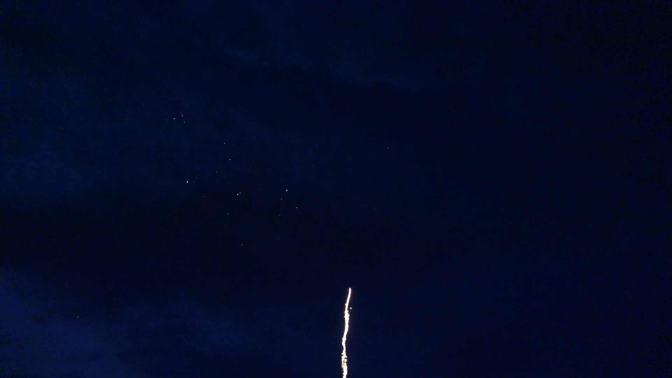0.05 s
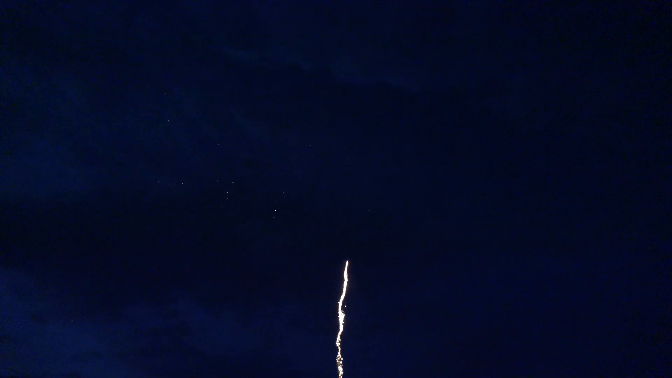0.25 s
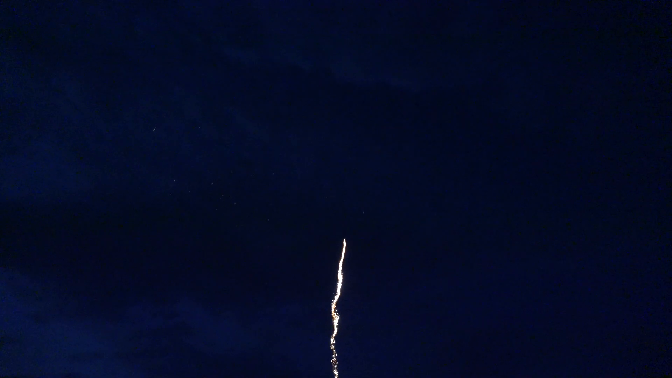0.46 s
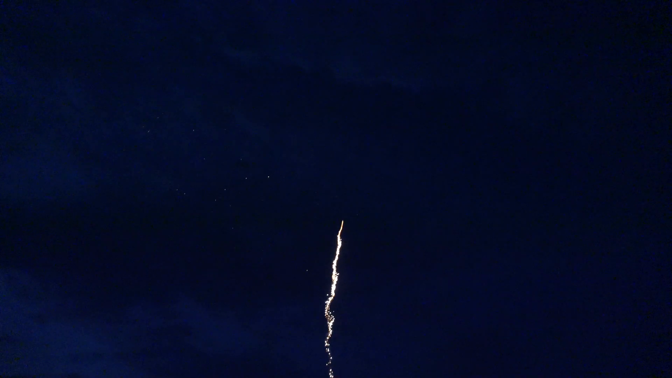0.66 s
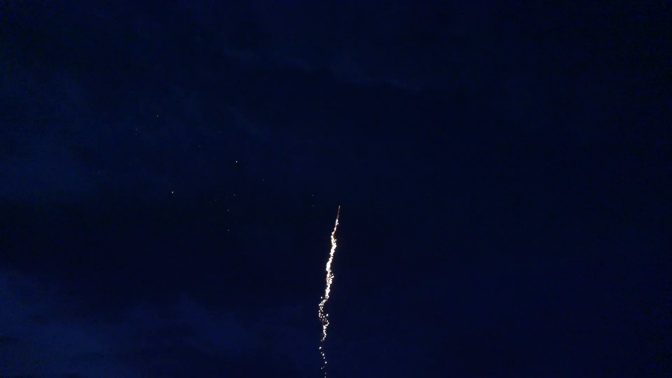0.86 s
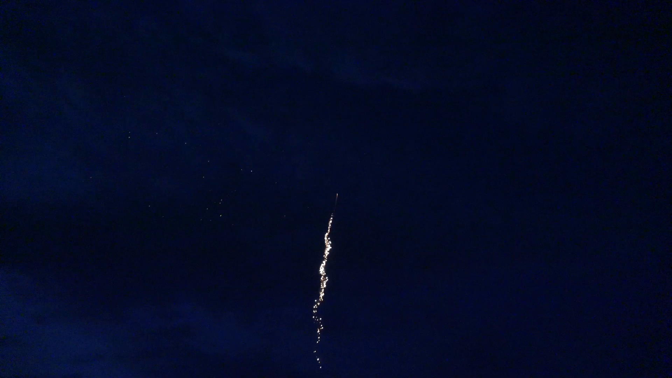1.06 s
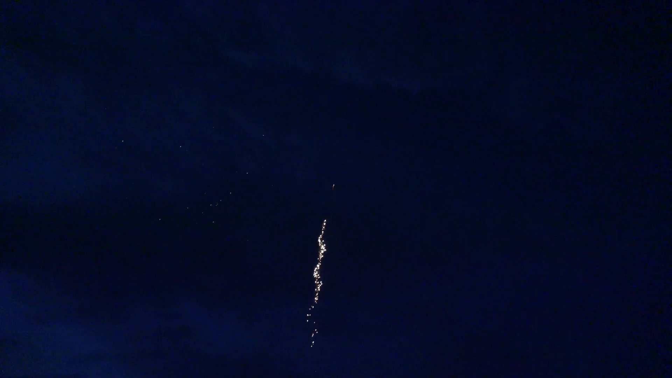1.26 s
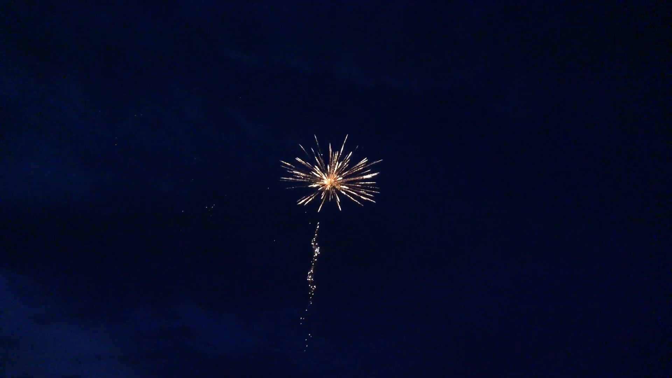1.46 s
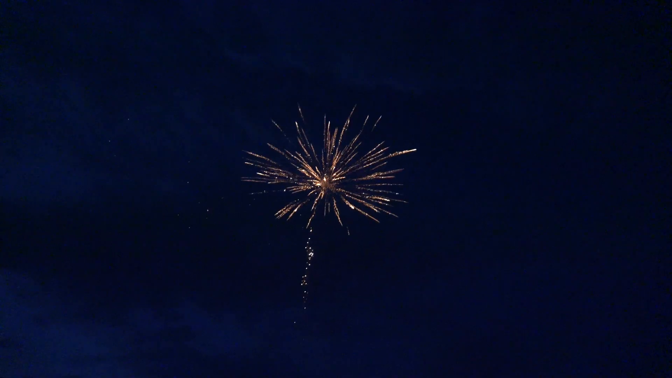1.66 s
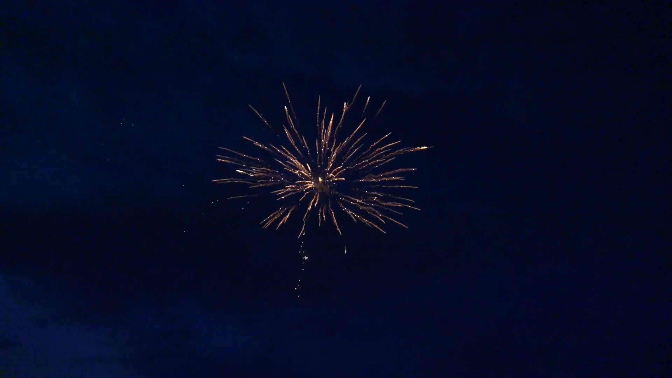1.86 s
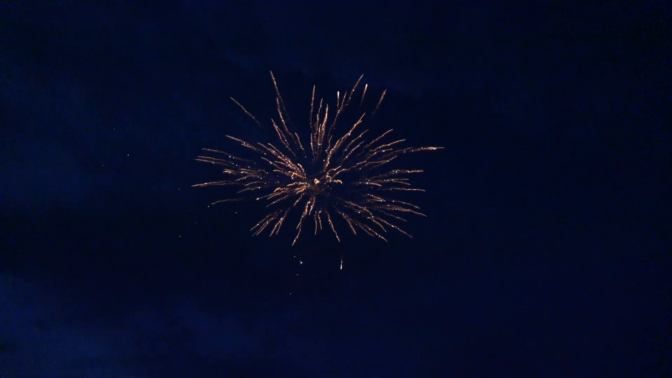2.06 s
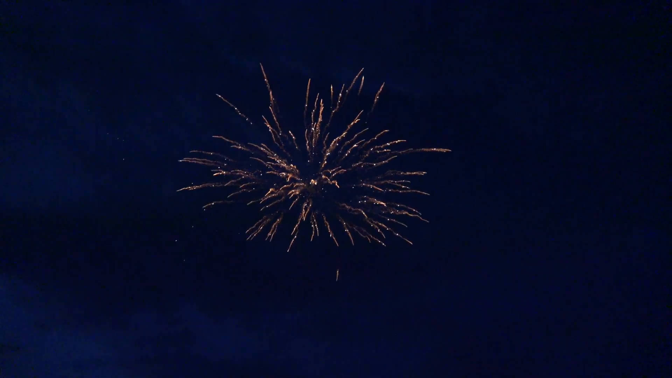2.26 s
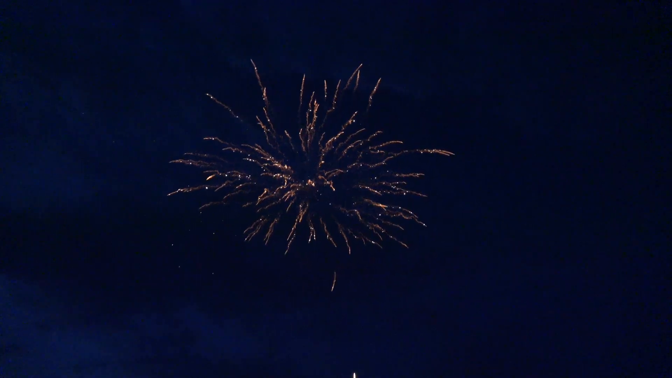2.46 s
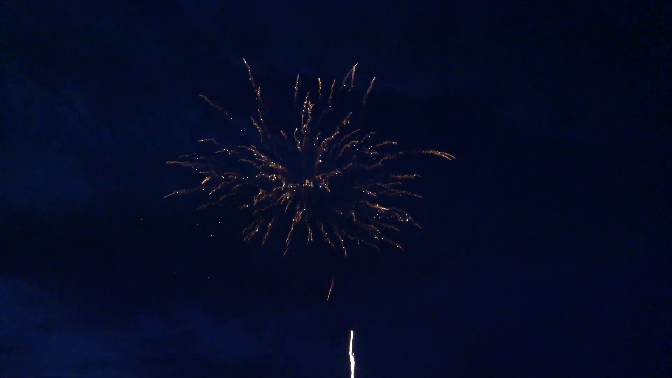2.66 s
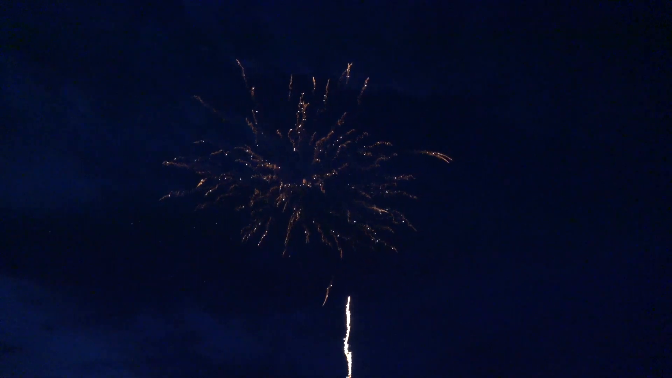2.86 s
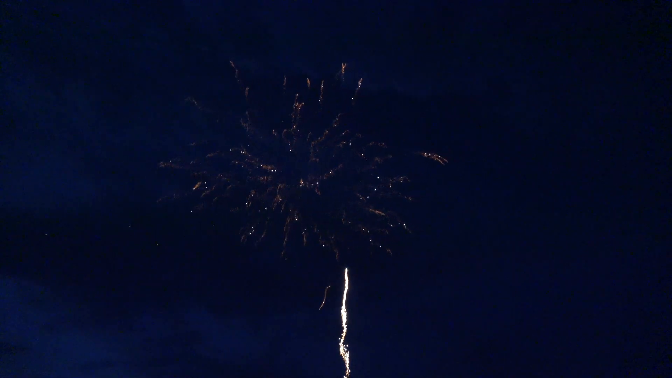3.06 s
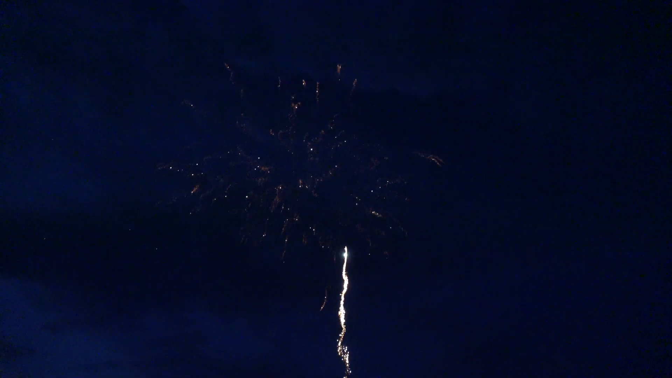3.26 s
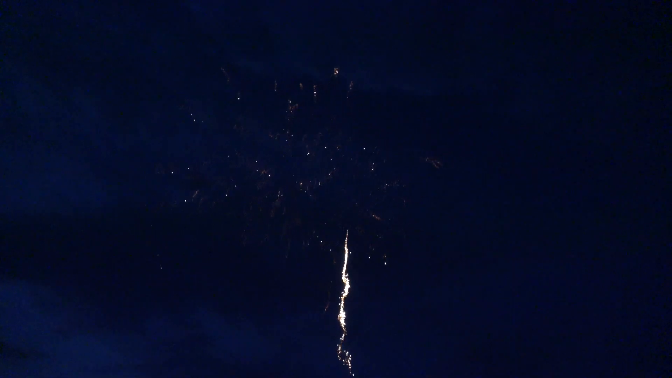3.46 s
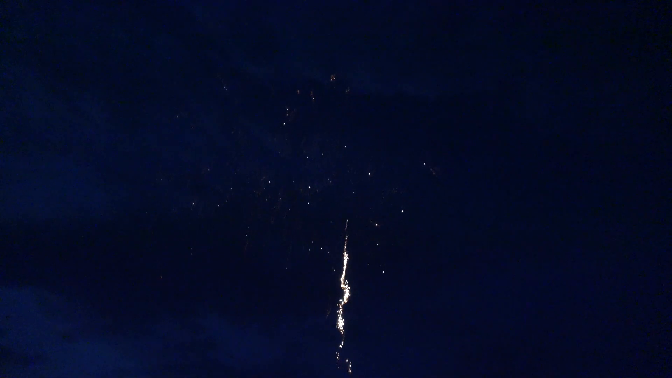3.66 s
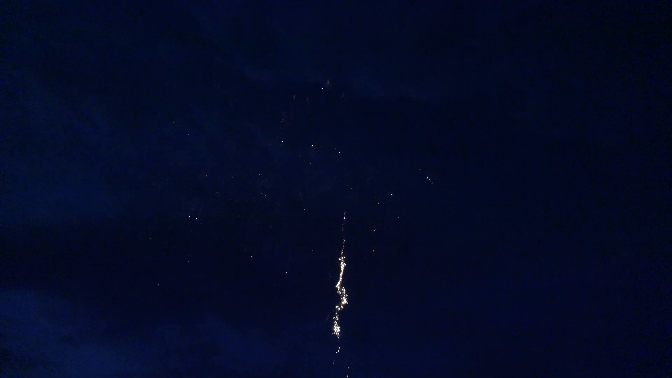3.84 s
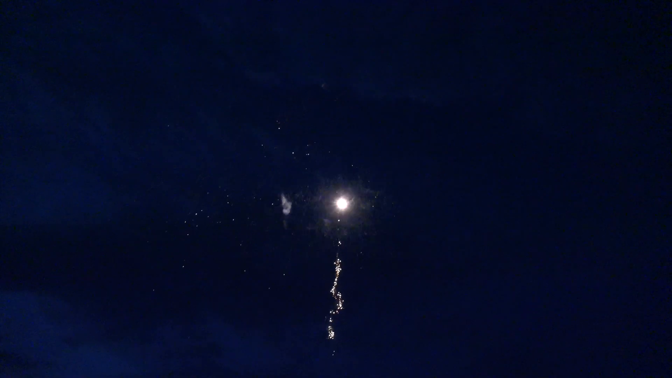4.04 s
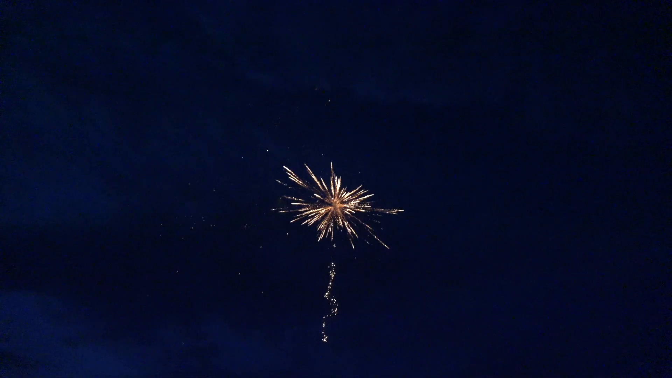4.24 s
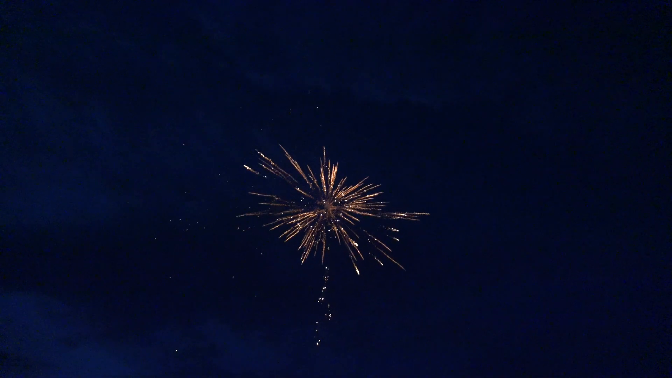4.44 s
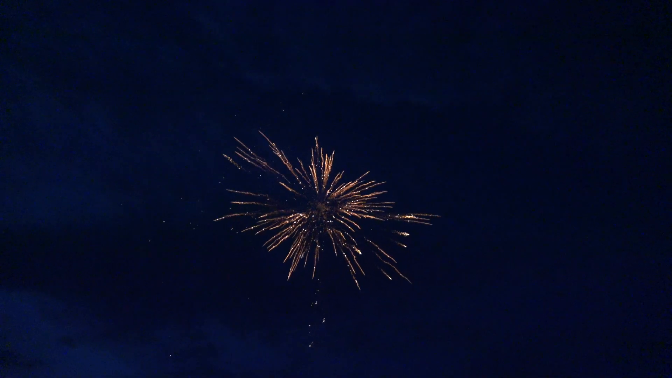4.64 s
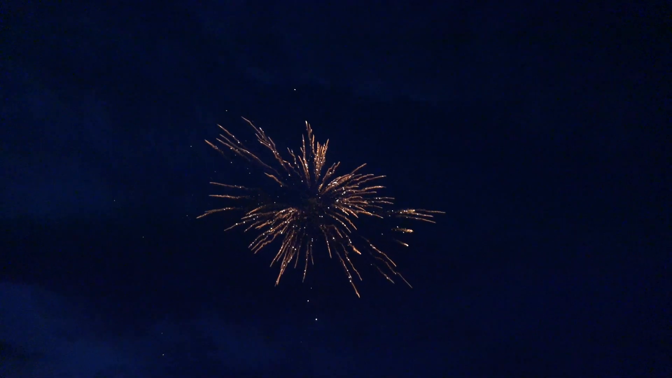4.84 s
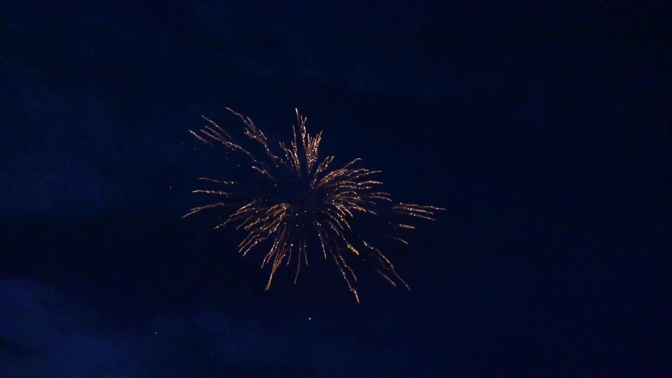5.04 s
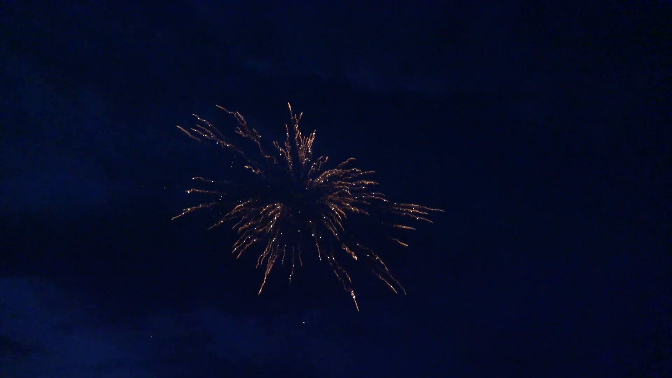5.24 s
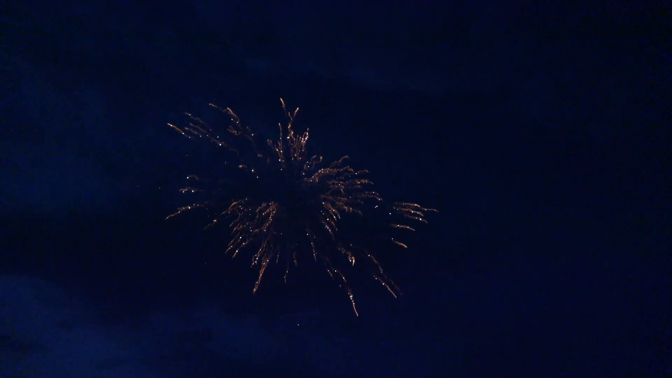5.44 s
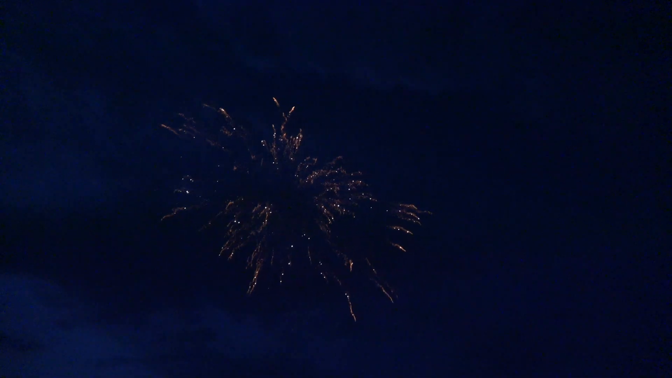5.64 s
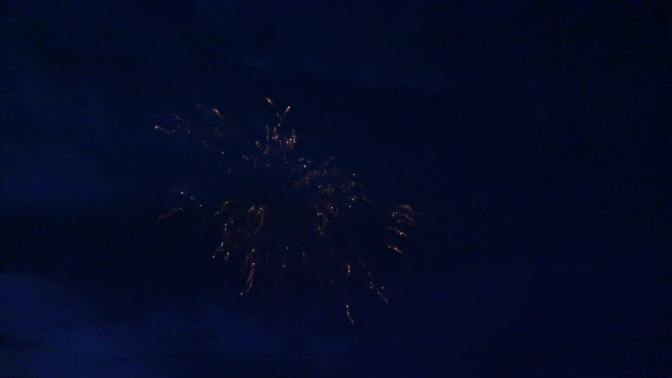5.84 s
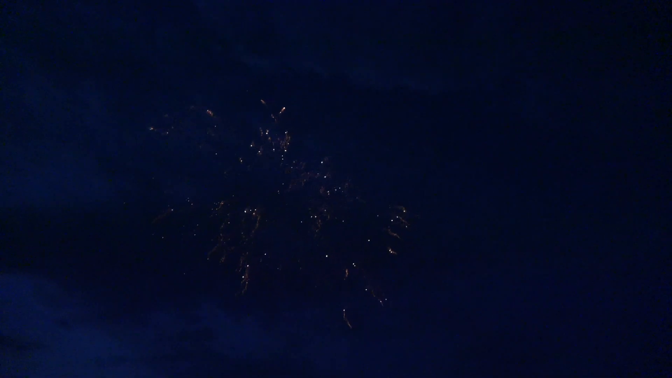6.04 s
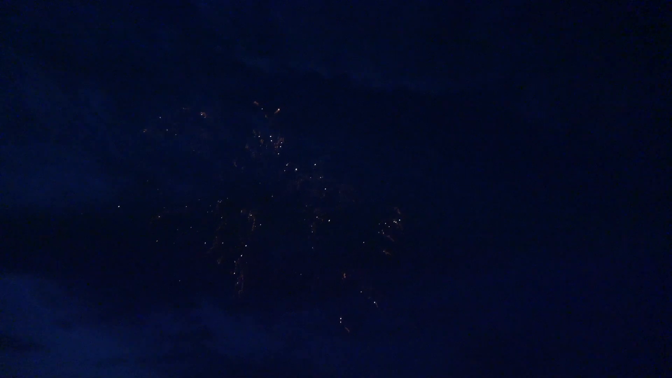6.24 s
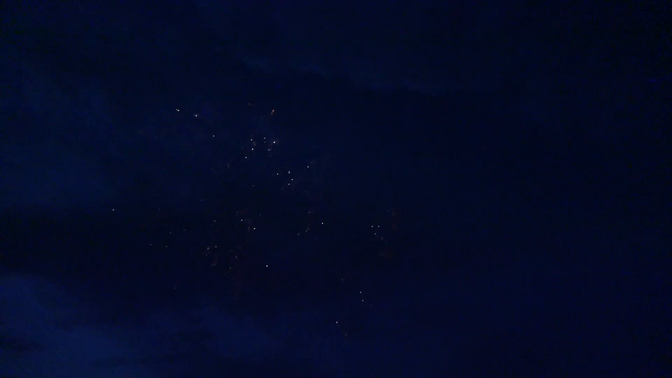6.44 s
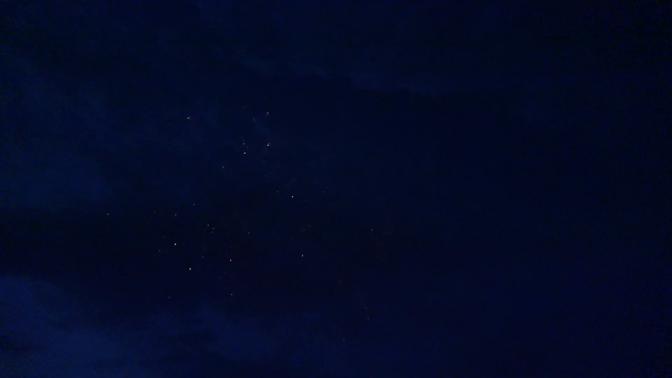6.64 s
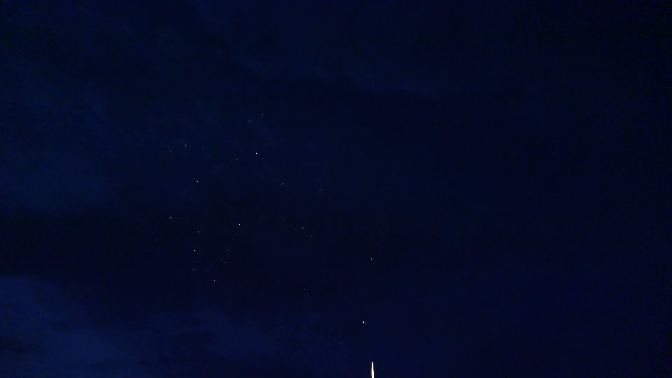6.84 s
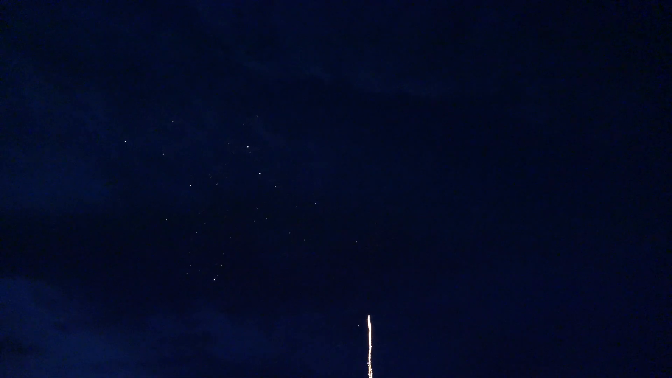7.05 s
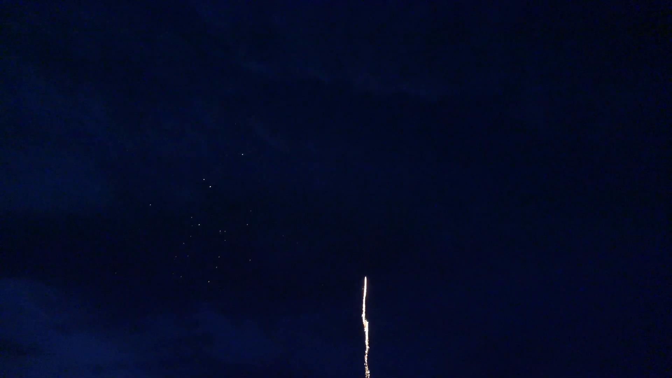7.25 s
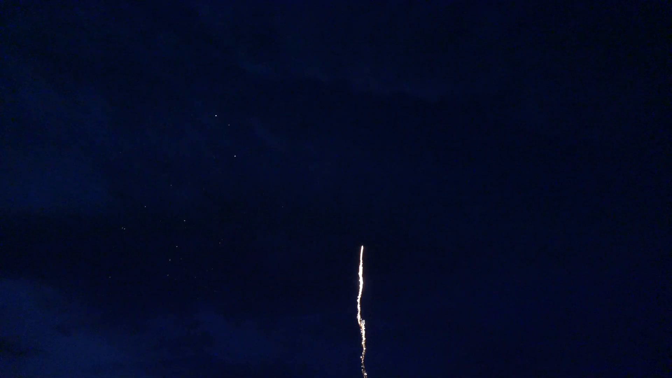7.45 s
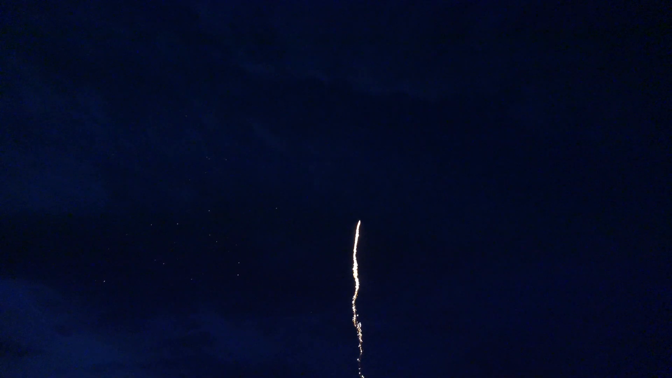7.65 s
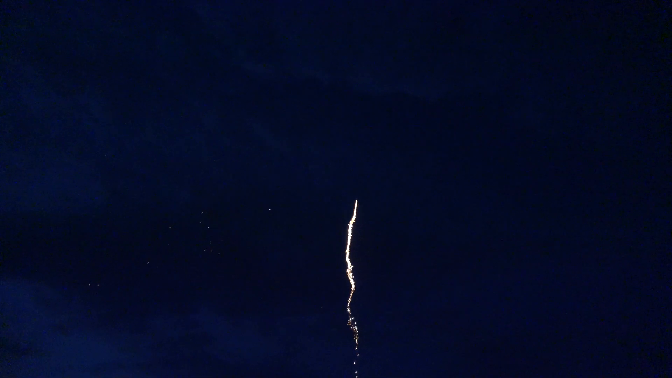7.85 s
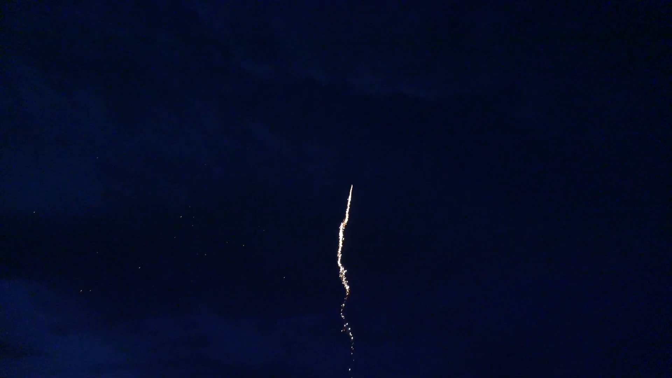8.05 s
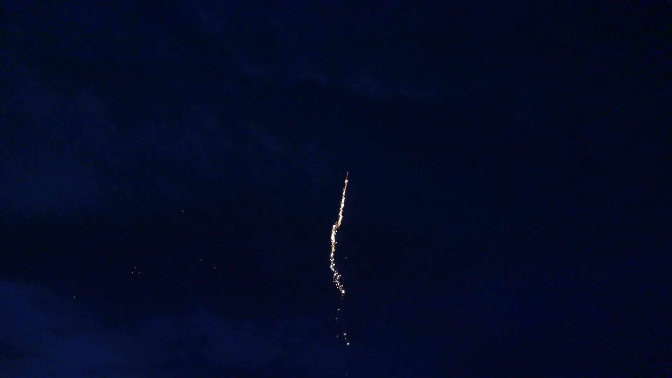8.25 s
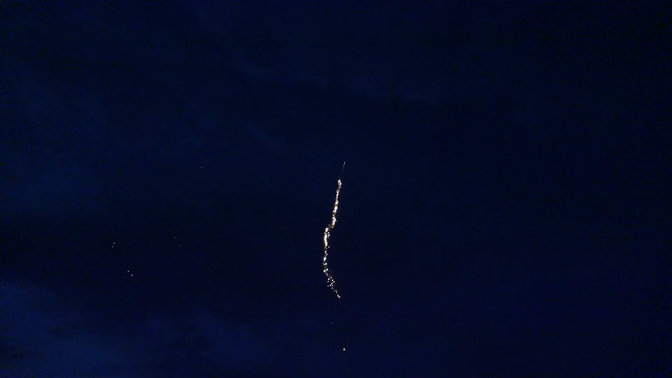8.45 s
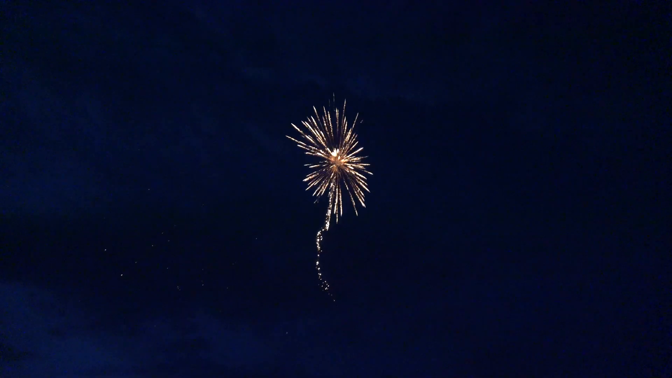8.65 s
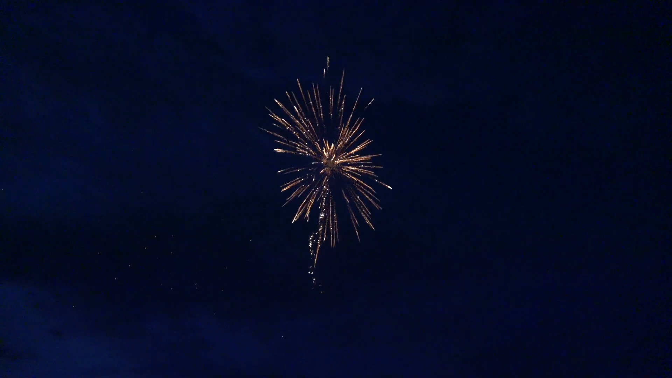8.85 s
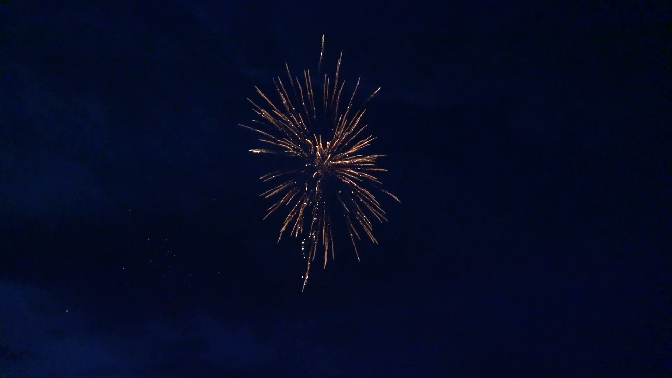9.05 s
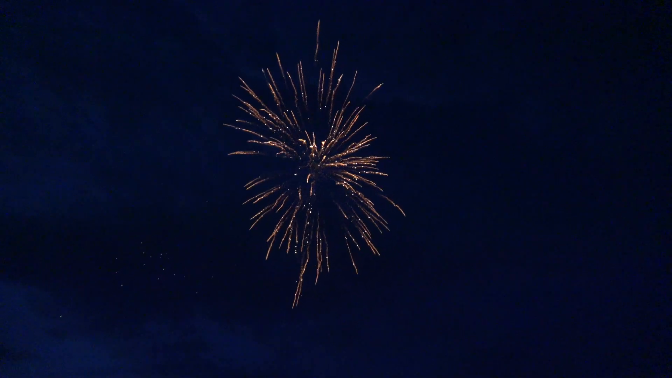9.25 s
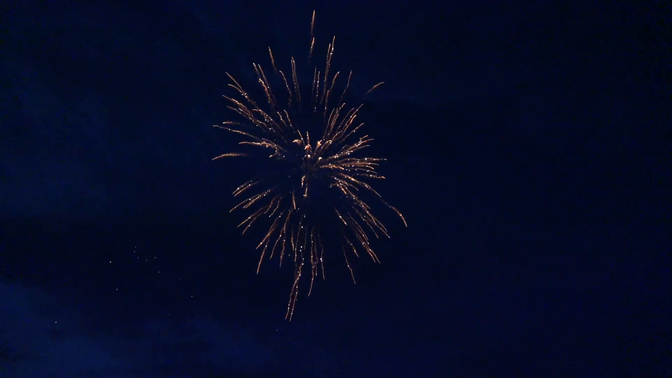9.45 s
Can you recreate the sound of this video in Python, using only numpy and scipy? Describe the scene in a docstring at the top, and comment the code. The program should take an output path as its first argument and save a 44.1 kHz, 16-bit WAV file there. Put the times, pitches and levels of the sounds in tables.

```python
"""Night fireworks and frogs

A firework cake fires over open ground: a mortar thump, two seconds later the burst overhead, each a steep
pressure front with crackle that rolls back from buildings and trees as echoes and shaped noise. Sliding sines
make a chorus of small frogs near 3 kHz, and sharp ticks are snaps of noise nearby. A faint fizz, low wind
flutter and night air are noise. One microphone feeds the left input; the unused right input only hisses.
A quick limiter tames the loud fronts."""
import sys
import numpy as np
from scipy import signal
from scipy.io import wavfile
from scipy.ndimage import uniform_filter1d

SR = 44100
rng = np.random.default_rng(int(sys.argv[2]) if len(sys.argv) > 2 else 0)


def generate_wav(sig):
    """Save sig (samples, or channels by samples) to the path in sys.argv[1] as 16-bit PCM at SR."""
    pcm = np.round(np.clip(np.atleast_2d(sig).T, -1, 1) * 32767).astype(np.int16)
    wavfile.write(sys.argv[1], SR, pcm)


N = 418950

# Bursts overhead. Each row: start in seconds, blast level in dB before the limiter, echo field level in dB.
BURSTS = [(1.6267, 28, 1.7), (4.3868, 27, 0.58), (8.7607, 28.5, 1.37)]
# Mortar thumps, one of them before the sound begins. Each row: the same columns as the bursts.
LAUNCHES = [(-.42, 16, 0.1), (2.2890, 20.6, 0.1), (6.7334, 17.4, 0.11)]
# Single reflections of a burst, the first one off the ground.
# Each row: delay in seconds, level in dB against the blast, treble limit in Hz, fading time of the puff in seconds.
BURST_ECHOES = [(.0036, -1, 4450, 0.0015), (0.0568, -30.5, 3960, 0.0036), (0.084, -28.5, 4300, 0.0032),
                (.1365, -31.5, 3000, 0.003), (.149, -44, 5500, .006), (.170, -50, 7950, .008),
                (0.342, -56, 500, .002)]
# Single reflections of a launch. Each row: the same columns.
LAUNCH_ECHOES = [(0.093, -19.5, 2550, 0.0029), (0.135, -30, 700, .002), (0.177, -36, 6000, .012)]
# Dense echoes after a burst. Each row: delay in seconds, boom off walls in dB, scatter off trees in dB.
BURST_FIELD = [(.012, -5, -14), (.03, -18, -26.5), (.054, -21.5, -32), (.059, -13, -27.5),
               (.084, -9.5, -24), (.135, -12.5, -22), (.17, -12.5, -16), (.25, -16, -12.5), (.6, -22, -12),
               (1.15, -22.5, -19), (2.3, -31, -31.5)]
# Dense echoes after a launch. Each row: the same columns.
LAUNCH_FIELD = [(.015, -19, -40), (.05, -30, -33), (.11, -24, -41.5), (.172, -62, -36), (0.181, -23, -22.5),
                (.3, -24.5, -18), (.7, -31.5, -28), (1.3, -39, -38.5), (2, -62, -52)]
# Tone balance of the boom. Each row: frequency in Hz, relative level in dB per Hz.
BOOM_SPECTRUM = [(25, -40), (50, -6.5), (100, 1.8), (170, 7), (260, -3), (340, -4.5), (450, -9.5),
                 (600, -21.5), (1200, -77)]
# Tone balance of the scatter after a burst. Each row: frequency in Hz, relative level in dB per Hz.
BURST_SCATTER = [(200, -53), (450, 0), (650, -3), (900, 1), (1100, -3.5), (1350, -3), (1650, -6),
                 (1900, -4.5), (2500, -7), (3300, -7), (4500, -10.5), (7000, -11.5), (9500, -16.5),
                 (11000, -27)]
# Tone balance of the scatter after a launch. Each row: frequency in Hz, relative level in dB per Hz.
LAUNCH_SCATTER = [(200, -35), (450, -0.5), (900, 1.5), (1500, 2), (2500, 3.5), (4000, -3), (7000, -7),
                  (11000, -19)]
# The boom narrows as it rolls on. Each row: frequency in Hz, loss in dB per second.
BOOM_LOSS = [(60, 7.5), (110, 13), (170, 3), (260, -1), (350, 10), (600, 7)]
# Air dulls the longer paths. Each row: frequency in Hz, loss in dB per second.
AIR_LOSS = [(1500, 1.91), (2500, 7), (4000, 12.5), (7000, 28.5), (11000, 50.5)]
# Nearer frog calls. Each row: start in seconds, starting pitch in Hz, length in seconds, level in dB.
NEAR_PEEPS = [(.34, 2695, 0.084, -25), (1.072, 3070, .066, -25), (1.201, 2775, .17, -24),
              (1.421, 2900, 0.047, -25), (2.81, 2800, .071, -29), (3.484, 2810, 0.081, -27.5),
              (3.52, 3140, 0.055, -32), (3.718, 2840, 0.083, -32), (4.181, 2800, 0.15, -28),
              (5.6, 2800, .094, -31), (6.674, 2900, 0.1, -31), (6.835, 3080, 0.055, -30),
              (7.211, 2810, .12, -30), (7.66, 3070, 0.1, -28), (7.726, 2806, 0.062, -26),
              (8.276, 2786, 0.12, -27.5), (8.406, 2810, 0.086, -25), (8.43, 3040, 0.13, -26)]
# The far frogs swell and thin slowly. Each row: time in seconds, level in dB.
CHORUS_LEVEL = [(0, -31.5), (.5, -30), (1.4, -29), (3.4, -33), (4.1, -31.5), (5.6, -33.5), (7.6, -30.5),
                (8.45, -30), (9.5, -26)]
# Sharp ticks. Each row: start in seconds, peak level in dB, bass limit in Hz.
TICKS = [(0.2043, -15.5, 3970), (1.008, -13, 900), (1.5216, -22, 4500), (2.7807, -13, 4000),
         (3.0233, -11.5, 1500), (3.2324, 2.5, 700), (3.422, -12.5, 1500), (3.5188, -24, 1500),
         (3.6448, -6.5, 700), (5.356, -32, 1500), (6.8858, -16, 1500), (7.532, -8.5, 600),
         (7.8733, -5, 1500), (7.9074, -11.5, 1000), (8.0467, -26, 4500)]
# Low flutter on the microphone. Each row: time in seconds, level in dB.
WIND_LEVEL = [(0, -50), (.95, -36), (3.2, -50), (3.6, -56), (6.7, -58), (7.9, -42), (8.6, -54), (9.5, -53)]
# Tone balance of night air and input hiss. Each row: frequency in Hz, relative level in dB per Hz.
NIGHT_SPECTRUM = [(12, -25), (30, -10), (60, -3.5), (150, 3.5), (300, -8.5), (700, -7.5), (1500, -19.5),
                  (2500, -25), (4000, -42), (7000, -35.5), (11000, -47)]

SLAP_DB, SLAP_S = 3.5, 0.013  # each single reflection stirs up the scatter, which settles again
FIELD_FADE_S = 1  # the echo field dies away after its last row
NEAR_TOP_HZ, OPEN_S = 3500, 0.13  # the nearest returns are dull; the treble has joined in after this long
FIZZ_S, FIZZ_DB = 3.53, -50  # time and level of the fizz at its loudest
FIZZ_RISE_DB_PER_S, FIZZ_FALL_DB_PER_S = 33, 52
GLIDE_HZ_PER_S = 2300  # every frog call slides up at this pace
HUSH_DB, HUSH_S = -21, 0.32  # the far chorus dips after each burst and comes back
TICK_TOP_HZ = 6960
NIGHT_DB, IDLE_INPUT_DB = -38.5, -60.5
EDGE_HZ = 10900  # upper edge of the whole recorded band


def blast(ring_hz, fade_s, rise_s, crackle, crackle_s):
    """A steep pressure front that swings under and over once more, with turbulent crackle on it."""
    t = np.arange(1024) / SR
    fade = np.exp(-(t / fade_s) ** 3.7)
    rise = 1 - np.exp(-t / rise_s)
    swing = np.cos(2 * np.pi * ring_hz * t) * fade * rise
    return swing + crackle * rng.standard_normal(1024) * np.exp(-t / crackle_s)


def reflection(pulse, top_hz, spread_s):
    """One echo: a rough surface smears the front into a puff of crackle and dulls it."""
    puff = 0.59 * rng.standard_normal(1024) * np.exp(-np.arange(1024) / SR / spread_s)
    low_pass = signal.butter(2, min(top_hz, 20000), fs=SR)
    return signal.lfilter(*low_pass, blast(*pulse) + puff)


def echo_field(echoes, field, scatter):
    """Dense echoes: walls return a boom, while tree lines and roofs scatter the blast as noise."""
    s, boom_db, scatter_db = np.transpose(field)
    t = np.arange(s[0], s[-1] + FIELD_FADE_S, 1 / SR)
    fade_in = np.minimum((t - s[0]) / 0.0013, 1)
    fade_out = np.clip((t[-1] - t) / FIELD_FADE_S, 0, 1)
    boom = gain_of(np.interp(t, s, boom_db)) * noise(BOOM_SPECTRUM, len(t), patchy_db=1.5, loss=BOOM_LOSS)

    stirred_db = sum(SLAP_DB * (t > echo[0]) * np.exp(-abs(t - echo[0]) / SLAP_S) for echo in echoes)
    # tree lines and roofs at uneven distances return the blast as separate slaps at first
    unevenness = evened(uniform_filter1d(rng.standard_normal(len(t)), size=500))
    slaps_db = stirred_db + 4.4 * np.exp(-t / 0.28) * unevenness
    trees_gain = gain_of(np.interp(t, s, scatter_db) + slaps_db)
    trees = trees_gain * noise(scatter, len(t), patchy_db=1.0, loss=AIR_LOSS)

    dull = signal.lfilter(*signal.butter(1, NEAR_TOP_HZ, fs=SR), trees)
    treble = trees - dull
    trees = dull + np.minimum(t / OPEN_S, 1) ** 2 * treble
    return fade_in * fade_out * (boom + trees)


def shots(table, pulse, echoes, field, scatter):
    """Each blast arrives directly, then by single reflections, then as the dense echo field."""
    out = np.zeros(N)
    for start_s, db, field_db in table:
        add(out, start_s, gain_of(db) * blast(*pulse))
        for delay_s, echo_db, top_hz, spread_s in echoes:
            add(out, start_s + delay_s, gain_of(db + echo_db) * reflection(pulse, top_hz, spread_s))
        field_start_s = start_s + field[0][0]
        add(out, field_start_s, gain_of(field_db) * echo_field(echoes, field, scatter))
    return out


def fireworks():
    """Bursts and deeper mortar thumps; the microphone picks up little of their deep bass."""
    # each pulse: swing in Hz, fade in s, rise in s, crackle amount, crackle fade in s
    burst_pulse = (326, 0.0028, 0.0000035, 0.14, 0.002)
    launch_pulse = (167, 0.006, 0.00035, 0.38, 0.0027)
    mix = shots(BURSTS, burst_pulse, BURST_ECHOES, BURST_FIELD, BURST_SCATTER)
    mix += shots(LAUNCHES, launch_pulse, LAUNCH_ECHOES, LAUNCH_FIELD, LAUNCH_SCATTER)
    return signal.sosfilt(signal.butter(2, 55, "high", fs=SR, output="sos"), mix)


def fizz():
    """Tiny unresolved crackles, high and far, as the first stars die: treble noise that swells and fades."""
    late_s = np.arange(N) / SR - FIZZ_S
    crackles = noise([(2500, -24), (4500, 11), (7000, 6.0), (10500, -23)], size=N, patchy_db=4.0)
    swell_db = np.minimum(FIZZ_RISE_DB_PER_S * late_s, -FIZZ_FALL_DB_PER_S * late_s)
    return evened(crackles) * gain_of(FIZZ_DB + swell_db)


def peep(start_hz, length_s):
    """One frog call: a near sine that slides upward."""
    t = np.arange(0, length_s, 1 / SR)
    cycles = (start_hz + GLIDE_HZ_PER_S * t / 2) * t
    return np.sin(2 * np.pi * cycles) * signal.windows.tukey(len(t), .7)


def frogs(count=2500):
    """Many far peeps merge into a band; a few nearer ones stand out; vegetation smears them all."""
    far, near = np.zeros((2, N))
    t = np.arange(N) / SR
    for when, length, loss, pitch in rng.random((count, 4)):
        call = peep(2480 + 820 * pitch, 0.064 + 0.074 * length)
        call_db = -8 * loss - 15 * (2 * pitch - 1) ** 2  # odd pitches are the faint ones
        add(far, when * N / SR - .1, gain_of(call_db) * call)

    smear_fade_s = np.array([[.06], [.04]])
    far_smear, near_smear = rng.standard_normal((2, 9000)) * np.exp(-np.arange(9000) / SR / smear_fade_s)
    far = 0.74 * evened(far) + evened(signal.oaconvolve(far, far_smear)[:N])
    # a fast random flutter in level roughens the far calls and blurs their pitch
    far *= 1 + 0.19 * evened(uniform_filter1d(rng.standard_normal(N), size=60))
    hush_db = sum(HUSH_DB * (t > burst[0]) * np.exp(-abs(t - burst[0]) / HUSH_S) for burst in BURSTS)
    far = evened(far) * gain_of(np.interp(t, *np.transpose(CHORUS_LEVEL)) + hush_db)

    for start_s, hz, length_s, db in NEAR_PEEPS:
        add(near, start_s, gain_of(db) * peep(hz, length_s))
    near_smear = near_smear / np.linalg.norm(near_smear)
    return far + near + 0.3 * signal.oaconvolve(near, near_smear)[:N]


def ticks():
    """Very short snaps, each with a duller bounce off the ground 2.5 ms later and a short hissing tail."""
    out, t = np.zeros(N), np.arange(1500) / SR
    for start_s, db, low_hz in TICKS:
        snap_grit, tail_grit = rng.standard_normal((2, 1500))
        snap = np.cos(2 * np.pi * 3500 * t) * np.exp(-t / .0001)
        snap = snap + 0.75 * snap_grit * np.exp(-t / 0.00026)
        bounce = np.roll(uniform_filter1d(snap, size=4), round(0.0025 * SR))
        tail = tail_grit * np.exp(-t / 0.0045)
        sound = snap + 0.33 * bounce + 0.079 * tail
        sound = signal.lfilter(*signal.butter(1, (low_hz, TICK_TOP_HZ), "band", fs=SR), sound)
        add(out, start_s, gain_of(db) * sound / abs(sound).max())
    return out


def wind():
    """Low flutter on the microphone: lumpy noise rumble below 50 Hz."""
    band_pass = signal.butter(2, (14, 42), "band", fs=SR, output="sos")
    rumble = signal.sosfilt(band_pass, rng.standard_normal(N))
    return evened(rumble) * gain_of(np.interp(np.arange(N) / SR, *np.transpose(WIND_LEVEL)))


def night_air():
    """Night air and input hiss: a steady bed of noise, strongest in the low tones."""
    return gain_of(NIGHT_DB) * noise(NIGHT_SPECTRUM, size=N, patchy_db=2.5)


def idle_input():
    """The unused right input: faint electrical hiss, stronger toward the bass."""
    hiss = noise([(20, 15), (100, 0.5), (1300, -3), (10000, -6.5)], size=N, patchy_db=2.0)
    return gain_of(IDLE_INPUT_DB) * hiss


def noise(spectrum, size, patchy_db, loss=((1, 0), (2, 0))):
    """Noise from random short-time spectra with drifting patches; loss dulls it as time passes."""
    frames, hz = size // 128 + 6, np.fft.rfftfreq(512, 1 / SR)[:, None]
    real, imaginary, patches = rng.standard_normal((frames, 257, 3)).T
    patches = uniform_filter1d(patches, size=12, axis=0)  # smooth across frequency
    patches = evened(uniform_filter1d(patches, size=10, axis=1))  # smooth across time
    shape = gain_of(read(spectrum, hz))
    lost_db = read(loss, hz) * np.arange(frames) * 128 / SR
    z = (real + 1j * imaginary) * shape * gain_of(patchy_db * patches - lost_db)
    x = signal.istft(z, nperseg=512, noverlap=384)[1][:size]
    # the spectrum sets only the tone balance; patches and loss still change the level
    return evened(x) * np.sqrt(np.mean(abs(z) ** 2) / np.mean(shape ** 2) / 2)


def gain_of(db):
    """Turn decibels into a factor for the wave."""
    return 10 ** (np.asarray(db) / 20)


def evened(x):
    """Scale a signal to an average (RMS) level of one."""
    return x / np.sqrt(np.mean(x ** 2) + 1e-20)


def read(points, hz):
    """Read a table at any frequency, along a logarithmic pitch scale."""
    f, value = np.transpose(points)
    return np.interp(np.log(hz + 1), np.log(f + 1), value)


def add(mix, start_s, sound):
    """Lay a sound into the mix, cutting off whatever falls outside it."""
    at = round(start_s * SR)
    length = max(len(sound) + min(at, 0), 0)
    part = mix[max(at, 0):][:length]
    part += sound[max(-at, 0):][:len(part)]


def scene():
    """All sounds meet at the left input; the right one has only its own hiss."""
    left = fireworks() + fizz() + frogs() + ticks() + wind() + night_air()
    return np.array([left, idle_input()])


def record(dry):
    """The limiter takes about a millisecond to close, so fronts clip; it reopens within tens of ms."""
    fall_db = np.arange(N) * 640.0 / SR  # reopens at 640 dB a second
    peak_db = 20 * np.log10(abs(dry) + 1e-9)
    held_db = np.maximum.accumulate(peak_db + fall_db, axis=1) - fall_db
    over_db = np.maximum(held_db - 0.5, 0)  # acts above 0.5 dB
    keep = np.exp(-1 / (0.00093 * SR))  # smooths the gain over 0.93 ms
    cut_db = signal.lfilter([1 - keep], [1, -keep], over_db)
    limited = np.clip(dry / gain_of(cut_db), -.97, .97)
    low_pass = signal.firwin(511, EDGE_HZ, window=("kaiser", 9), fs=SR)
    return signal.oaconvolve(limited, low_pass[None], "same")


dry = scene()
out = record(dry)
generate_wav(out)
```